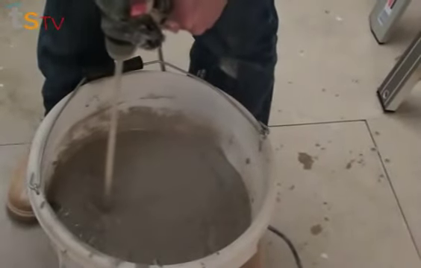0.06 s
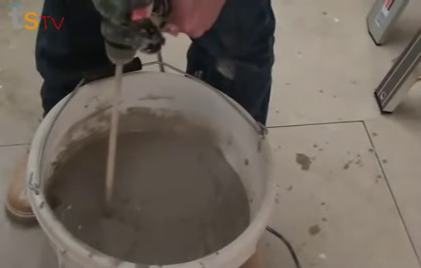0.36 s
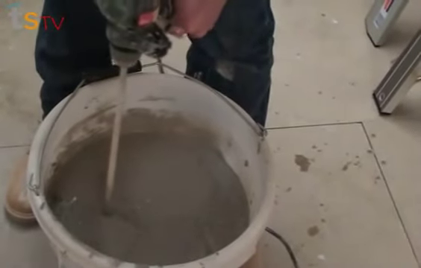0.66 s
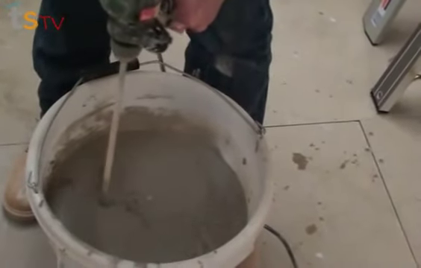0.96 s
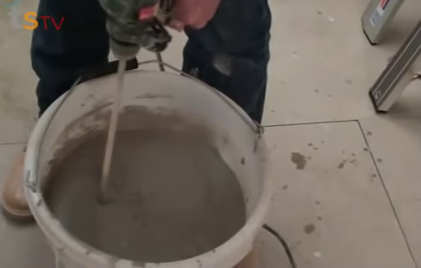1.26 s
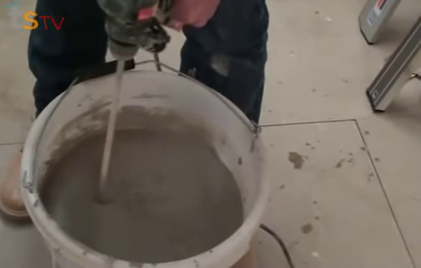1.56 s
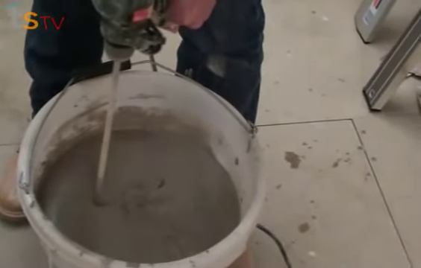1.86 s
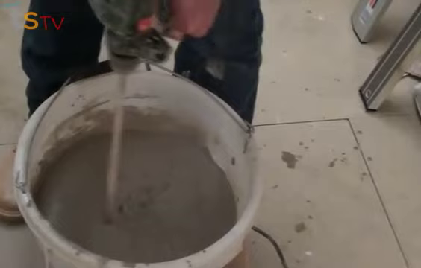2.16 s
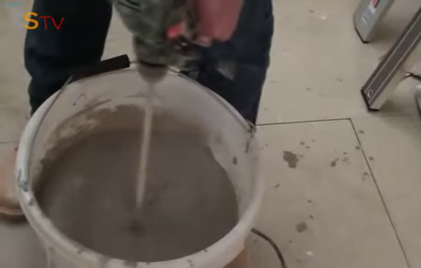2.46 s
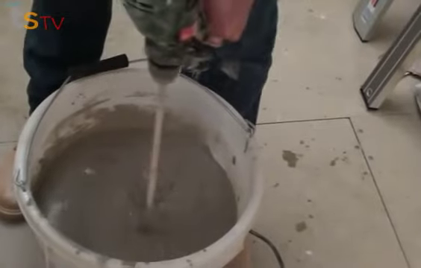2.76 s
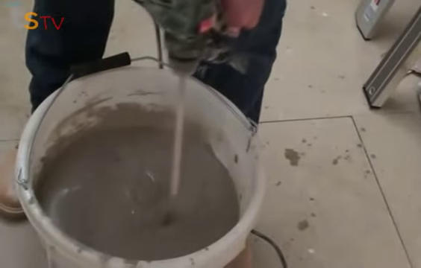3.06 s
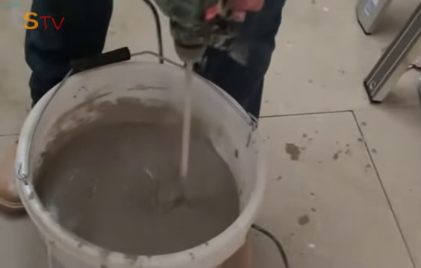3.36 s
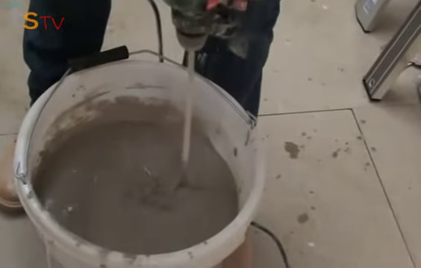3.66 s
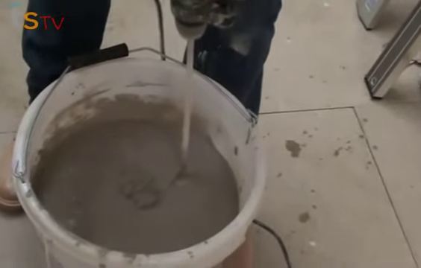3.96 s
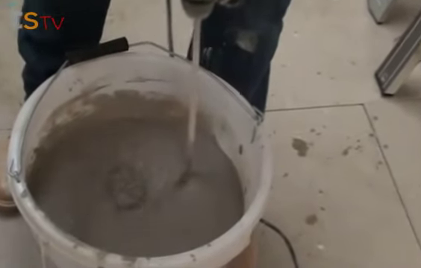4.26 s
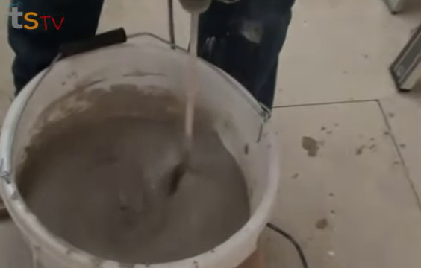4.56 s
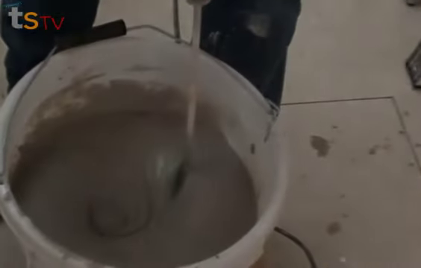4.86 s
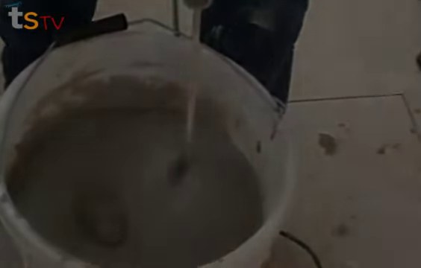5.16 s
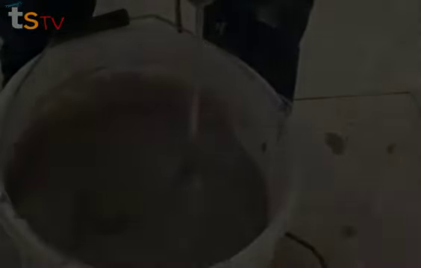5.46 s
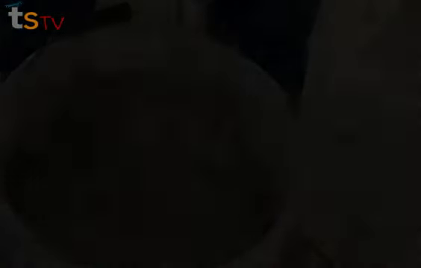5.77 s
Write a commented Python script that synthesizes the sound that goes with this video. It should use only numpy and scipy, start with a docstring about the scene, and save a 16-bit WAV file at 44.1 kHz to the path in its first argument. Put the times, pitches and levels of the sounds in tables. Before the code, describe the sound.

Heard up close in a bare room, a mixing drill runs with a rough whine, a hiss of air and a very high motor whistle. It slows and picks up again in the first second, then keeps its speed. Thick paste rumbles softly while the paddle rubs and booms against the plastic bucket. A brief hissing squeal passes after the middle, the whine grows smoother, and everything fades away with the drill still running.

```python
"""A bare room, one microphone close to an electric drill mixing thick adhesive in a plastic bucket.
The motor's pinion whines on a big gear wheel, rough under load and cleaner as the paddle lifts.
The commutator sings far above it, the cooling fan hisses, and the paddle drums where it bears on
the bucket while the paste rumbles. The speed sags in the first second; the last second is fading out."""
import sys
import numpy as np
from scipy import signal
from scipy.fft import rfft, irfft, next_fast_len
from scipy.io import wavfile

SR = 44100
rng = np.random.default_rng(int(sys.argv[2]) if len(sys.argv) > 2 else 0)


def wav_record(signal):
    """Record a signal, one row per channel, as 16-bit PCM in the file named by sys.argv[1]."""
    frames = np.transpose(np.atleast_2d(signal))
    bounded = np.clip(frames, -1, 1)
    # unit amplitude maps onto the largest positive 16-bit level
    quanta = np.round(bounded * 32767).astype(np.int16)
    wavfile.write(sys.argv[1], SR, quanta)


N = 255780

# Teeth meeting per second, before the sags: time_s, mesh_hz
RUNNING_SPEED = [(0.25, 1007), (1.05, 1022), (1.4, 1017), (1.65, 1004), (1.87, 1008), (2.3, 987),
                 (2.55, 1002), (3.0, 1015), (3.17, 995), (3.42, 995), (3.88, 1020), (4.2, 1022),
                 (4.55, 1059), (4.78, 1049), (4.96, 1057), (5.23, 1039), (5.39, 1020), (5.8, 1031)]
# The motor sags and picks up again: middle_s, half_length_s, speed_lost_share
SPEED_SAGS = [(0, 0.095, 0.28), (.527, 0.16, .275), (0.895, .052, .06)]
# The paddle's drag, which makes the teeth chatter: time_s, load (1 is full)
PADDLE_LOAD = [(0, 0.68), (.55, 0.88), (1.5, 0.96), (2.3, 0.85), (3.05, 0.95), (3.35, 0.61), (3.7, 0.43),
               (4.2, 0.31), (5, 0.29)]
# The gear whine: mesh_harmonic, free_running_db, db_per_load, db_per_octave_of_sag,
# free_running_flutter_share, roughness_per_load
GEAR_HARMONICS = [(1, -24.5, -4, 8.5, 0.11, 0.93), (2, -24.5, -5.5, 6, 0.1, 1.41),
                  (3, -28.5, -1.5, -4, 0.3, 2.57), (4, -28.5, -2.5, -3, .3, 3),
                  (5, -30, -1, -6, 0.37, 3.52), (6, -30.5, -0.5, -11, 0.18, 3.1),
                  (7, -37.5, 8, -13, 0.33, 4.2), (8, -40, 4.5, 3, 0.06, 10.93)]
# One harmonic rings out as the drill is moved about: start_s, end_s, mesh_harmonic, gain_db
GEAR_RINGS = [(0.813, 0.914, 1, 4), (.97, 1.25, 4, 3.5), (1.3, 1.8, 3, 3), (1.38, 2.35, 8, 7.5),
              (1.45, 2.27, 5, 5.5), (2.458, 3.1, 1, 4.5), (2.474, 3.694, 4, 3), (2.85, 3.1, 5, 2),
              (3.506, 4.4, 2, 1), (3.549, 4.252, 1, 3.6), (4.25, 5.601, 6, 1), (4.42, 4.7, 3, 3)]
# The brush whistle and its side lines: cycles_per_motor_turn, relative_db
BRUSH_LINES = [(36, -15), (37, -10), (38, -6), (39, 0), (40, -6), (41, -6), (42, -13)]
# The brush whistle at running speed: time_s, level_db
BRUSH_LEVEL = [(.2, -24.5), (.8, -26.5), (1.3, -31), (2.5, -31.5), (2.9, -33.5), (3.4, -31.5), (3.9, -32.5),
               (4.5, -27.5), (5.8, -28)]
# The motor housing, which radiates the brushes: frequency_hz, relative_db
HOUSING_RESPONSE = [(3000, -20), (7000, 9), (8600, 10), (9600, 11.5), (10800, 10), (11500, -6),
                    (15000, -22)]
# Air through the vents: frequency_hz, relative_db
VENT_SPECTRUM = [(30, -43), (130, -12), (350, -6), (620, -10), (780, 0.5), (1300, -4.5), (2600, -7),
                 (3600, -2.5), (5600, -1.5), (7300, 0.5), (8600, -2), (11000, -5.5), (13200, -14.5),
                 (15200, -41)]
# The paddle bears on the bucket: start_s, end_s, base_boom_db, wall_drumming_db
PADDLE_RUBS = [(0, 0.445, -46, -42.5), (0.579, .8, -54, -41.5), (1.04, 1.367, -41, -44.5),
               (1.528, 1.77, -45, -43.5), (1.897, 2.118, -48.5, -47), (2.472, 3.56, -41.5, -37),
               (3.81, 4.094, -44, -47)]
# The boom of the bucket's base: frequency_hz, relative_db
BASE_RESPONSE = [(25, -37), (55, -19), (82, -4.5), (108, -10.5), (136, 2), (188, 4), (225, -12), (330, -39)]
# The drumming of the bucket's wall: frequency_hz, relative_db
WALL_RESPONSE = [(170, -38), (245, -1), (327, 2.5), (400, -6), (600, -7), (1200, -54)]
# The paste folding over: frequency_hz, relative_db
PASTE_SPECTRUM = [(20, -12), (50, -7), (120, -6), (250, -2), (600, -40)]
# The paste's rumble: time_s, level_db
PASTE_LEVEL = [(.2, -51), (.6, -57), (1.4, -57), (2.6, -46), (3.4, -58), (4.8, -65)]
# A narrow, hissing squeal: frequency_hz, relative_db
SQUEAL_SPECTRUM = [(8500, -42), (9100, 2), (9500, -6), (9800, -4), (10200, -35)]
# A thin sizzle at the very top: frequency_hz, relative_db
SIZZLE_SPECTRUM = [(12000, -48), (13800, -3), (15000, -2), (16000, -13)]
# The room's reverberation: frequency_hz, t60_s
ROOM_DECAY = [(200, 0.12), (2000, 1), (12000, 0.022)]

PINION_TEETH, WHEEL_TEETH, MAINS_HZ = 4, 37, 50
TIME_S = np.arange(N) / SR


def gears(wheel, load, sag, sway_rad=0.72, scatter=0.99, grind=2.1, flutter_damping=0.74):
    """Teeth whine as they meet: wear repeats each turn, backlash chatters and a sagging motor grinds."""
    mesh = 2 * np.pi * WHEEL_TEETH * wheel
    whine = np.zeros(N)
    for k, free_db, load_db, sag_db, runout, roughness in GEAR_HARMONICS:
        ring_db = sum(db * held(start, end, attack_s=.08, release_s=.12)
                      for start, end, harmonic, db in GEAR_RINGS if harmonic == k)
        level_db = free_db + load_db * load + sag_db * sag + ring_db
        worn = tooth_errors(wheel, reach=4.5, memory=.9)
        chatter = tooth_errors(wheel, reach=3, memory=.2)
        rasp = tooth_errors(wheel, reach=.6, memory=0)
        rough = scatter * roughness * load * amp(-ring_db)  # a ringing harmonic is purer
        grinding = grind * sag * (k - 1) ** 2  # a timing error smears high harmonics most
        texture = 1 + rough * unit(worn + chatter) + grinding * rasp
        texture /= np.sqrt(1 + rough ** 2 + grinding ** 2)
        # The wheel runs off centre: once a turn the teeth press harder, and meet early, then late.
        angle = 2 * np.pi * wheel + rng.normal()
        flutter = 1 + runout * np.exp(-flutter_damping * load) * np.cos(angle)  # drag steadies it
        lag = sway_rad * load * np.sin(angle)
        tone = np.exp(1j * (k * mesh + lag + 2 * np.pi * rng.random()))
        whine += amp(level_db) * unit(flutter * np.real(texture * tone))
    return whine


def motor_motion(ripple_turns=.004):
    """The motor's angle in turns and its sag in octaves; the torque pulses twice per mains cycle."""
    running_hz, = curves(RUNNING_SPEED)
    speed_share = 1 - sum(lost * swell(middle, half) for middle, half, lost in SPEED_SAGS)
    turns = np.cumsum(running_hz * speed_share) / SR / PINION_TEETH
    ripple = ripple_turns * np.sin(2 * np.pi * 2 * MAINS_HZ * TIME_S)
    return turns + ripple, -np.log2(speed_share)


def commutator(motor, load, sag, db_per_octave=-8):
    """Brushes skip over the bars: a cluster of high lines, blurred by sparking under load."""
    level_db, = curves(BRUSH_LEVEL)
    lines = sum(amp(db) * np.exp(2j * np.pi * (k * motor + rng.random())) for k, db in BRUSH_LINES)
    sparking = load * tooth_errors(motor, reach=14, memory=0, count=13)
    blur = (1 + sparking) / np.sqrt(1 + load ** 2)
    return amp(level_db + db_per_octave * sag) * coloured(np.real(lines * blur), HOUSING_RESPONSE)


def fan(motor, wheel, load, sag, chop=0.19, treble_hz=8800):
    """Air rushes through the vents, surging at the wheel's tight spot and dulling as the motor slows."""
    air = noise(VENT_SPECTRUM)
    treble = filtered(air, lambda hz: 1 / (1 + (treble_hz / (hz + 1)) ** 10))
    air += treble * (amp(-15 * sag) - 1)
    tight_spot = .22 * np.cos(np.pi * wheel) ** 8
    surge = 1 + tight_spot + chop * np.cos(2 * np.pi * motor)
    level_db = -23.5 - 1.26 * load + 5 * sag
    return amp(level_db) * unit(air * surge)


def bucket(wheel, load, slosh=0.79, slosh_hz=14):
    """The shaft shakes the bucket at multiples of the wheel's rate, harder in each rub of the paddle."""
    base_gain, wall_gain = amp(-54 + 1.5 * load), amp(-49 + 2.8 * load)  # between rubs
    for start, end, base_db, wall_db in PADDLE_RUBS:
        press = held(start, end, attack_s=0.032, release_s=0.09)
        base_gain = np.hypot(base_gain, amp(base_db) * press)
        wall_gain = np.hypot(wall_gain, amp(wall_db) * press)
    hum = np.zeros(N)
    for k in range(1, 26):  # the paste makes each harmonic wander
        strength = 1 + slosh * wobble(slosh_hz)
        phase = 2 * np.pi * (k * wheel + rng.random()) + slosh * wobble(slosh_hz)
        hum += strength * np.cos(phase)
    return base_gain * coloured(hum, BASE_RESPONSE) + wall_gain * coloured(hum, WALL_RESPONSE)


def paste():
    """Thick adhesive folds over with a low rumble."""
    level_db, = curves(PASTE_LEVEL)
    return amp(level_db) * noise(PASTE_SPECTRUM)


def squeal():
    """A hissing squeal comes and goes once."""
    return amp(-29) * swell(middle_s=3.38, half_s=0.33) * noise(SQUEAL_SPECTRUM)


def sizzle():
    """A faint sizzle sits at the very top and swells once."""
    return (amp(-54) + amp(-43) * swell(middle_s=3.5, half_s=0.63)) * noise(SIZZLE_SPECTRUM)


def room(sound):
    """The bare floor and walls send a short diffuse tail back to the microphone."""
    hz, t, spectra = signal.stft(rng.standard_normal(SR // 2), SR, nperseg=256)
    decay = amp(-60 * t / along(ROOM_DECAY, hz)[:, None])
    _, tail = signal.istft(spectra * decay, SR, nperseg=256)
    return signal.fftconvolve(sound, tail / np.linalg.norm(tail))[:N]


def tooth_errors(turns, reach, memory, count=WHEEL_TEETH, table_turns=2048):
    """A rotor's complex error, rms 1: alike over reach teeth, with the share memory back each turn."""
    errors = rng.standard_normal((table_turns, count, 2)) @ [1, 1j]
    errors -= errors.mean(axis=1, keepdims=True)  # spacing errors cancel over a full turn
    errors = signal.lfilter([1], [1, -memory], errors, axis=0)
    settled = errors[table_turns // 10:].ravel()
    smooth = signal.lfilter([1], [1, -np.exp(-1 / reach)], settled)
    return unit(np.interp(turns * count, np.arange(len(smooth)), smooth))


def swell(middle_s, half_s, squareness=3.2):
    """A smooth rise from 0 to 1 and back, flatter on top than a bell."""
    return np.exp(-np.abs((TIME_S - middle_s) / half_s) ** squareness)


def held(start_s, end_s, attack_s, release_s):
    """A rise to 1 at the start, held to the end, then dying away."""
    rise = np.clip((TIME_S - start_s) / attack_s, 0, 1)
    return rise * np.exp(-np.maximum(TIME_S - end_s, 0) / release_s)


def wobble(rate_hz):
    """A random curve with rate_hz knots a second."""
    knots = rng.standard_normal(256)
    return np.interp(TIME_S * rate_hz, np.arange(len(knots)), knots)


def amp(db):
    """Decibels to gain."""
    return 10 ** (np.asarray(db) / 20)


def unit(x):
    """Scale to rms 1."""
    return x / np.sqrt(np.mean(np.abs(x) ** 2) + 1e-20)


def along(points, hz):
    """Read (frequency_hz, value) points on a log frequency axis."""
    knots_hz, values = np.transpose(points)
    return np.interp(np.log(hz + 1), np.log(knots_hz + 1), values)


def curves(rows):
    """One value per sample for each column after the time."""
    times_s, *columns = np.transpose(rows)
    return [np.interp(TIME_S, times_s, column) for column in columns]


def filtered(x, response):
    """Filter x by a gain that is a function of frequency."""
    size = next_fast_len(N + 8192)
    return irfft(rfft(x, size) * response(np.fft.rfftfreq(size, 1 / SR)), size)[..., :N]


def coloured(x, spectrum):
    """Shape x by a spectrum, at rms 1."""
    return unit(filtered(x, lambda hz: amp(along(spectrum, hz))))


def noise(spectrum):
    """Noise with this spectrum, at rms 1."""
    return coloured(rng.standard_normal(N), spectrum)


def scene(room_db=-18):
    """One motor drives drill and paddle; the close microphone hears little room and feeds both channels."""
    motor, sag = motor_motion()
    wheel = motor * PINION_TEETH / WHEEL_TEETH  # in turns
    load, = curves(PADDLE_LOAD)
    drill = gears(wheel, load, sag) + commutator(motor, load, sag) + fan(motor, wheel, load, sag)
    direct = drill + bucket(wheel, load) + paste() + squeal() + sizzle()
    return np.tile(direct + amp(room_db) * room(direct), (2, 1))


def record(dry):
    """The fader comes down steadily at the end; nothing passes above the band limit."""
    fade_span_s, top_hz = (4.75, 6.02), 15450
    fade = np.interp(TIME_S, fade_span_s, [1, 0])
    return filtered(dry * fade, lambda hz: hz < top_hz)


dry = scene()
out = record(dry)
wav_record(out)
```